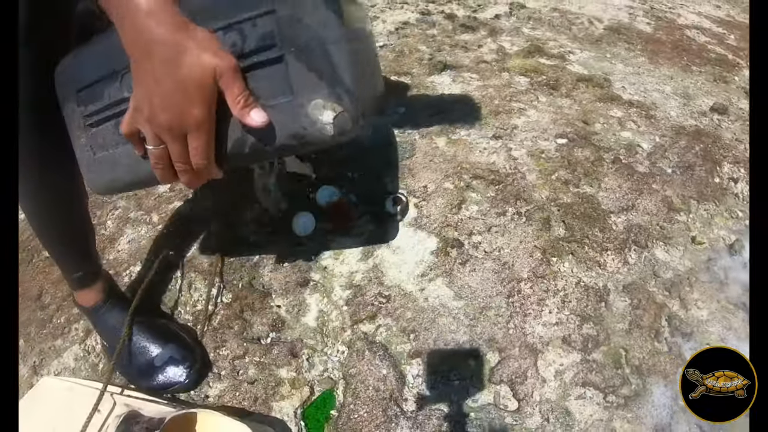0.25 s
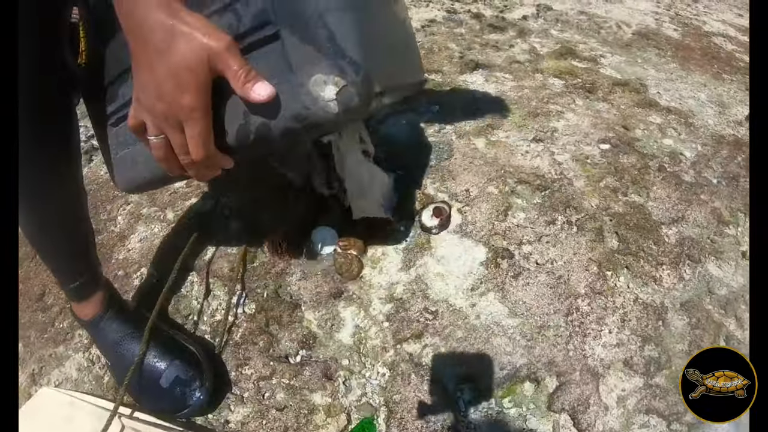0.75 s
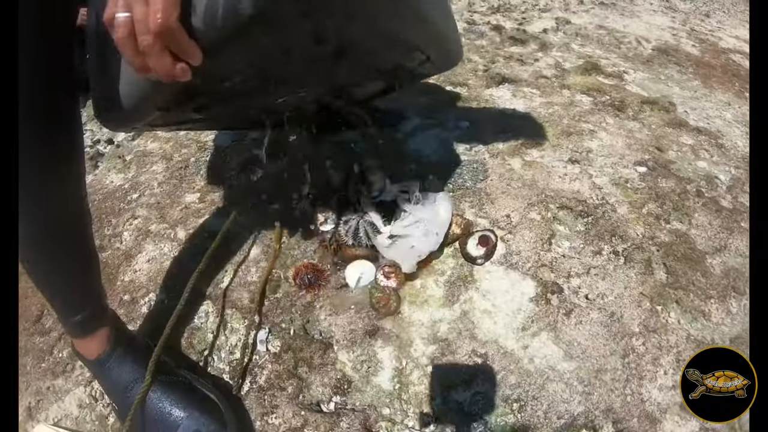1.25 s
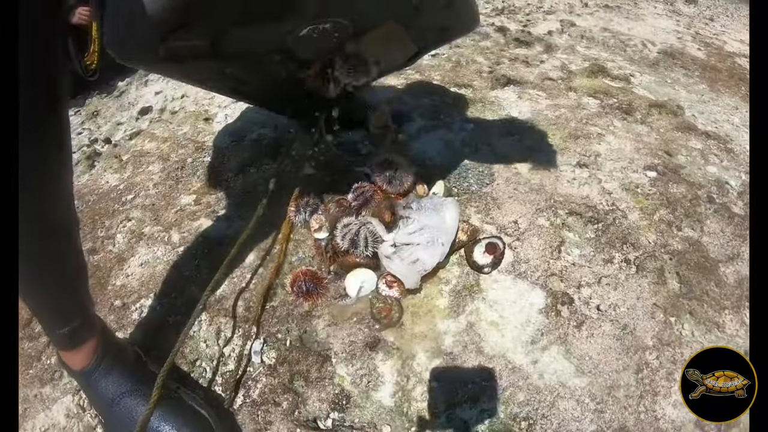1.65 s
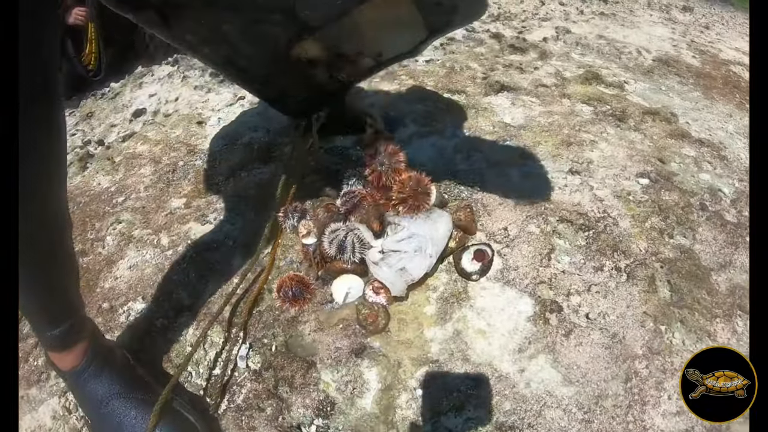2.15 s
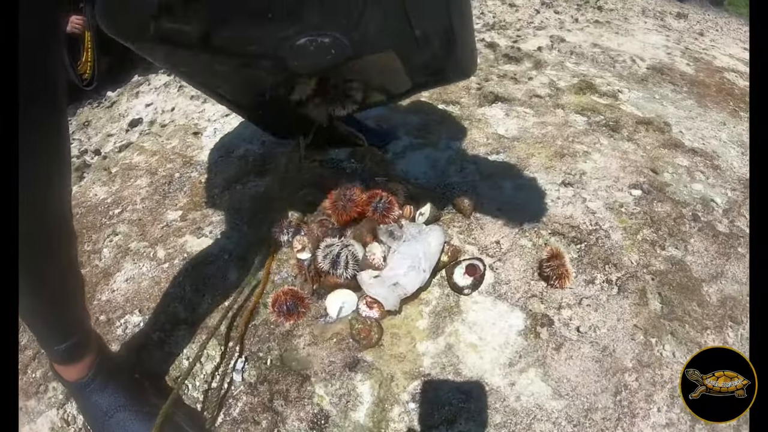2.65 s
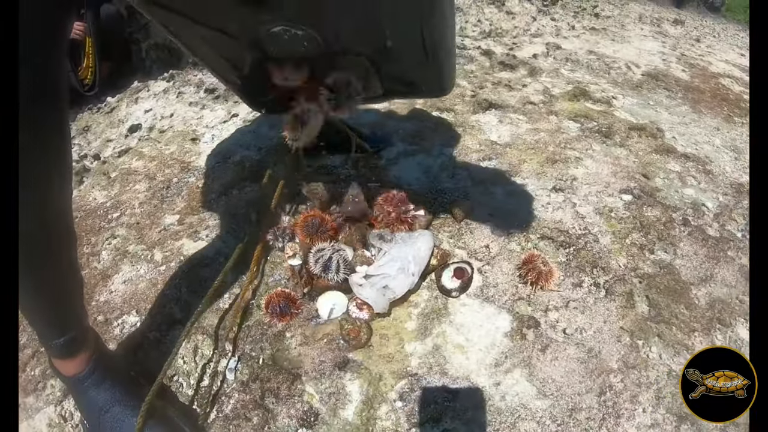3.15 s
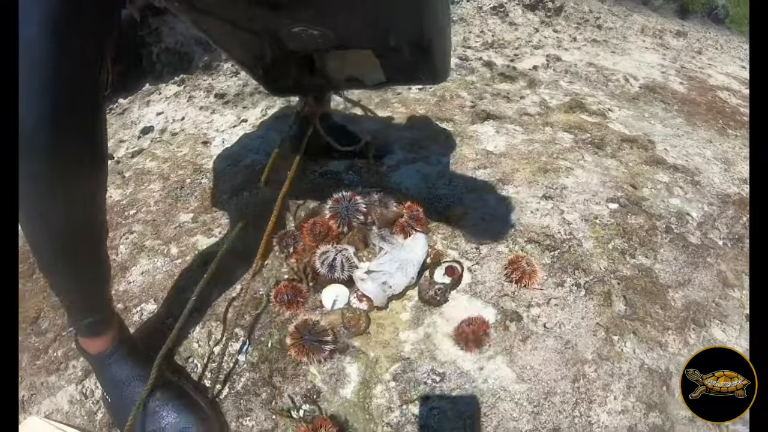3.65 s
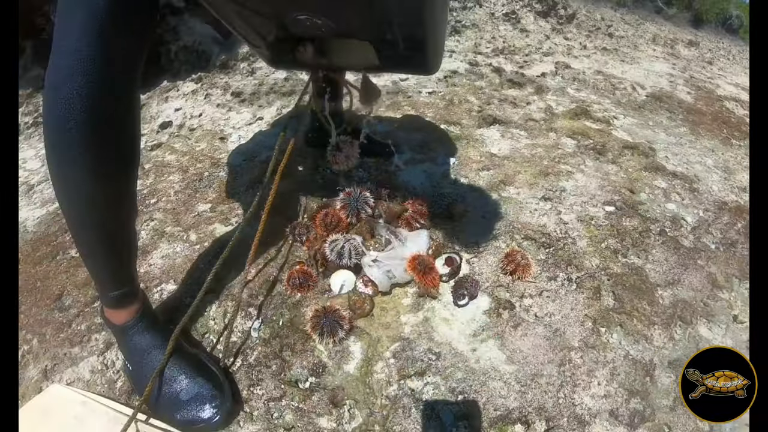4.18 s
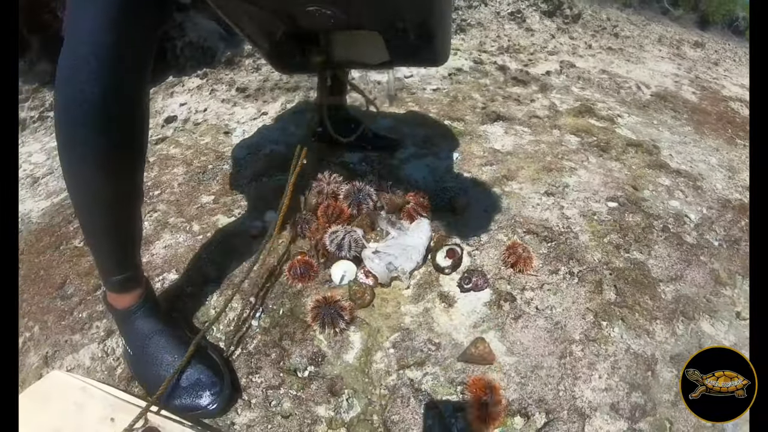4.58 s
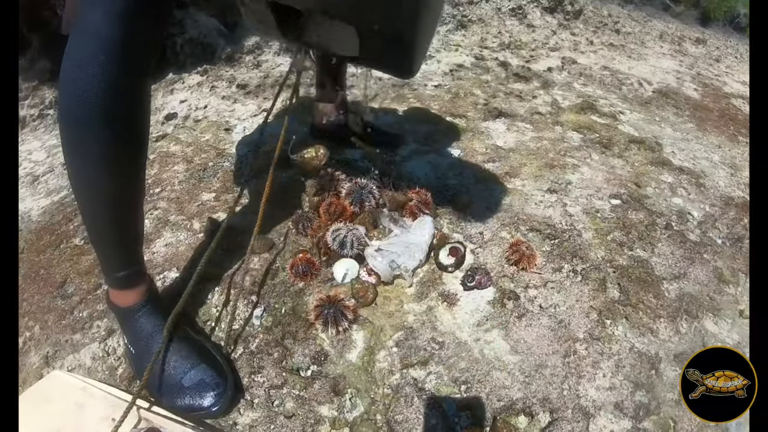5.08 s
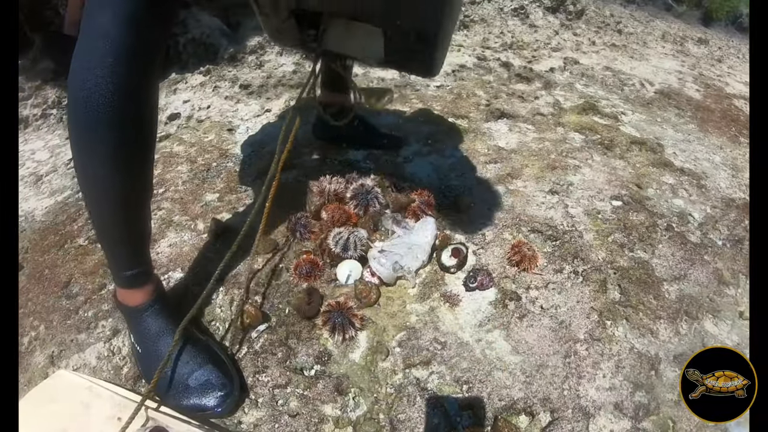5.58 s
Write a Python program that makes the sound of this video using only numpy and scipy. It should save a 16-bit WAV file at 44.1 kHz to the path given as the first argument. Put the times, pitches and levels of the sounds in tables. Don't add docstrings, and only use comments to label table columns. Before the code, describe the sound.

Shells and spiny sea urchins tumble out of a shaken hollow plastic container, clattering onto bare rock, with low wind rumble outdoors.

```python
import sys
import numpy as np
from scipy import signal
from scipy.fft import rfft, irfft, next_fast_len
from scipy.io import wavfile

SR = 44100
rng = np.random.default_rng(int(sys.argv[2]) if len(sys.argv) > 2 else 0)


def level_to_linear(level):
    exponent = np.asarray(level, float) / 20
    return 10 ** exponent


def log_audio(samples):
    frames = np.atleast_2d(samples).T
    limited = np.clip(frames, -1, 1)
    pcm = np.round(limited * 32767).astype(np.int16)
    wavfile.write(sys.argv[1], SR, pcm)


N = 256662

# full force in seconds, force in dB, time to fall 20 dB in seconds, wall rattle over boom in dB.
SHAKES = [(0.026, -12, .07, -9.5), (0.128, -21, 0.4, -14.5), (0.22, -16, 0.04, -8.5),
          (0.347, -10, 0.0969, -9), (0.497, -12.5, 0.1452, -11), (0.67, -20.5, 0.51, -7.5),
          (0.727, -22, 0.06, -3), (1.163, -20, 0.27, -14.5), (1.291, -24.5, 0.07, -7.5),
          (1.344, -28, 1.6, -10), (1.674, -19.5, 0.24, -8), (1.817, -28, 0.27, -2.5),
          (1.91, -13, 0.1465, -11), (2.072, -16, 0.09, -9), (2.305, -20, 0.23, -7.5),
          (2.451, -16.5, 0.08, -8.5), (2.815, -17.5, 0.21, -8.5), (2.88, -24.5, .04, 0),
          (3.179, -15, 0.33, -12.5), (3.512, -21.5, 0.2466, -5.5), (4.005, -23, 0.4, -11),
          (4.24, -23, 0.28, -10), (4.405, -26.5, 0.32, -9), (4.698, -31, .5, -9), (4.883, -24.5, 0.16, -8),
          (4.989, -22, 0.27, -9.5), (5.16, -25.5, 0.22, -9), (5.259, -28.5, 0.6, -8.5),
          (5.608, -30.5, 0.4, -3.5), (5.737, -26.5, 2, -9), (0.369, -19, 0.07, -9.5),
          (3.145, -34.5, 0.06, -7.5), (3.911, -40, 0.17, -5.5), (4.07, -30.5, 0.27, -3.5),
          (4.305, -27.5, 0.09, -6), (5.065, -28, 0.03, -4), (5.41, -31, 0.1, -4)]
# middle in seconds, depth in dB, half length in seconds.
CATCHES = [(0.102, 4, .015), (0.265, 5.5, 0.016), (0.336, 5, .01), (0.655, 7, 0.0086), (.838, 9.5, 0.013),
           (1.012, 7, .012), (1.102, 4.5, .015), (1.325, 8, 0.013), (1.411, 12, .02), (1.547, 3, 0.0072),
           (1.628, 11, .015), (1.815, 7, 0.014), (1.996, 8, 0.012), (2.288, 5.5, 0.0094),
           (2.538, 2, 0.0089), (3.662, 6, 0.0092), (3.944, 10, 0.014), (4.128, 6, 0.0068),
           (4.169, 8, 0.0084), (4.374, 5, 0.0098), (4.533, 3.5, .008), (4.601, 6, 0.011),
           (4.791, 5.5, .012), (4.852, 4.5, .01), (4.942, 8.5, .012), (5.107, 7, 0.017), (5.214, 6, 0.016),
           (5.323, 8.5, 0.015), (5.473, 6.5, .02), (5.671, 12.5, 0.03)]
# time in seconds, scratch over wall rattle in dB.
SPINE_DRAG = [(0, -17.5), (.45, -18.5), (.62, -10), (.75, -15.5), (.96, -9), (1.2, -19.5), (1.48, -11.5),
              (1.7, -21.5), (1.85, -19.5), (2.3, -18), (3.2, -23.5), (3.42, -10), (3.55, -21), (3.7, -10),
              (4.3, -21), (4.41, -11), (4.9, -20.5), (5.6, -15)]
# pitch in Hz, level in dB.
BOOM_MODES = [(112, -11.5), (140, -8.5), (164, 4), (186, -5.5), (228, -5.5), (290, -11.5)]
# pitch in Hz, level in dB per Hz.
WALL_COLOUR = [(350, -12.5), (530, 4), (750, 1.5), (1085, 7), (1140, 1), (2070, 1.5), (2600, -4.5),
               (3400, -2), (3700, -31)]
# pitch in Hz, level in dB per Hz.
SPINE_COLOUR = [(3500, 1), (5000, -1.5), (6700, -16), (8000, -7.5), (13000, -5.5), (15000, -21)]
# start in seconds, peak in dB, boom pitch in Hz.
HEAVY_HITS = [(0.125, -5.5, 198.6), (0.212, -4.5, 182), (0.339, -2.5, 181), (0.496, -10, 140),
              (0.615, -9.5, 147), (0.674, -14, 150), (0.848, -18, 154), (1.085, -17, 159),
              (1.158, -9.5, 176.5), (1.288, -26, 178), (1.651, -5, 182), (1.871, -6, 150), (1.923, -4, 185),
              (2.058, -6, 158), (2.253, -5, 219), (2.313, -10, 155), (2.378, -7, 206), (2.608, -15.5, 151),
              (2.797, -1, 208), (3.169, -4.5, 210), (3.511, -5.5, 172), (3.691, -11.5, 171),
              (3.993, -11.5, 175.3), (4.4, -11.5, 158), (4.574, -19, 142), (5.027, -3.5, 175),
              (5.155, -14, 168), (5.259, -11.5, 147), (5.432, -15, 97), (5.744, -7.5, 159)]
# start in seconds, peak in dB, boom pitch in Hz.
MORE_HITS = [(0.371, -6.5, 223), (0.544, -3.5, 147.4), (0.565, -6, 160), (0.796, -10, 159),
             (1.179, -9, 178), (1.224, -13.5, 167), (1.505, -17, 124), (1.694, -6.5, 189),
             (1.724, -11, 134), (1.959, -9.5, 176), (2.091, -13, 180), (3.203, -9, 196), (3.245, -6, 184),
             (4.029, -17, 157), (4.094, -11, 160), (4.243, -13, 151), (4.294, -15, 176),
             (4.709, -22, 170), (4.914, -17, 162), (5.504, -15, 102)]
# start in seconds, peak in dB, wall pitch in Hz.
WALL_KNOCKS = [(0.021, -8.5, 507), (0.121, -8.5, 850), (0.16, -8.5, 1310), (0.218, -6, 910),
               (0.348, -13, 1270), (0.506, -7.5, 954), (0.605, -8.5, 1080), (0.726, -5.5, 1065),
               (0.762, -7.5, 807), (0.847, -16, 1200), (1.288, -13.5, 545), (1.345, -12, 567),
               (1.561, -12, 533), (1.82, -8.5, 1090), (2.073, -8.5, 992), (2.095, -8, 1020),
               (2.257, -10, 475), (2.309, -0.5, 808), (2.451, -5, 890), (2.719, -17, 1460),
               (2.864, -15.5, 475), (2.887, -4.5, 1017), (2.959, -17.5, 1150), (3.017, -14, 903),
               (3.203, -7.5, 917), (3.317, -12, 990), (3.481, -14.5, 810), (4.612, -30, 1390),
               (5.704, -18.5, 1136), (5.792, -4.5, 1002)]
# start in seconds, peak in dB, wall pitch in Hz.
WALL_BUMPS = [(0.0848, -22, 440), (0.1819, -22, 480), (0.2183, -12.5, 420), (0.6618, -19, 880),
              (1.0908, -36, 1110), (1.2013, -23, 664), (1.2215, -24.5, 464), (1.8657, -18, 440),
              (2.3833, -18, 400), (2.5089, -23, 880), (2.8311, -17, 1080), (2.9136, -23, 710),
              (3.2575, -19, 446), (3.3759, -27, 1060), (3.5359, -16, 440), (3.6125, -26, 584),
              (4.2276, -27, 555), (4.4048, -27, 660), (4.5044, -29, 440), (4.9734, -24, 655),
              (5.045, -22, 410), (5.0666, -19.5, 1100), (5.1257, -28, 760), (5.1749, -25.5, 545),
              (5.4152, -23.5, 940)]
# start in seconds, peak in dB, panel pitch in Hz.
PANEL_THUDS = [
    (0.084, -18, 230),
    (0.2643, -22, 200),
    (0.6831, -16.5, 220),
    (1.1746, -14.5, 200),
    (1.4474, -24, 250),
    (1.56, -23, 308),
    (1.6735, -11, 210),
    (2.4535, -13.5, 303),
    (2.5047, -19, 220),
    (2.6778, -34, 200),
]
# start in seconds, peak in dB, pitch in Hz.
SHELL_CLACKS = [(0.0283, -12, 1520), (0.0556, -26, 1370), (0.1832, -25, 1380), (0.2067, -17, 1600),
                (0.2321, -19, 1700), (0.3717, -9.5, 1360), (0.5747, -22, 1560), (0.6343, -17, 4310),
                (1.09, -39, 3240), (1.501, -25, 2000), (1.6357, -29, 2850), (1.8631, -20, 1310),
                (1.957, -18, 1300), (2.0446, -23, 1660), (2.0946, -19, 1980), (2.254, -26, 2190),
                (2.3519, -18, 1870), (2.5098, -25, 1440), (2.6943, -45, 2180), (2.8506, -22, 2160),
                (2.9621, -26, 1850), (2.9822, -33, 2090), (3.2065, -14, 2310), (3.3835, -28, 2140),
                (4.2014, -31, 1740), (4.4584, -28, 2120), (4.5073, -30, 2100), (4.5168, -32, 1310),
                (4.7731, -32, 1990), (4.8887, -25, 1720), (4.9386, -33, 1680), (4.9715, -26, 1500),
                (5.361, -28, 3420), (4.6117, -21.5, 1400), (.8455, -15, 1100)]
# start in seconds, peak in dB, shell pitch in Hz, left-right in dB.
ROCK_LANDINGS = [(0.021, -9, 1800, 8), (0.084, -20.5, 3040, 0), (0.162, -15.5, 2280, 1),
                 (0.22, -6.5, 1700, 1), (0.344, -8, 2290, 1), (0.6335, -22, 3500, 6),
                 (0.6632, -4.5, 2250, -3), (0.7045, -7.5, 2900, -2.5), (0.791, -11.5, 2080, 1),
                 (0.814, -16.5, 3070, -4), (0.874, -15, 2070, 6), (1.0257, -12, 2020, -6),
                 (1.3479, -15, 1650, 1), (1.4314, -16, 2980, -3), (1.702, -18, 2140, 0),
                 (1.837, -6.5, 3090, -3), (2.055, -22, 2190, 4.5), (2.074, -8.5, 2240, -6.5),
                 (2.302, -5, 1510, -4), (2.308, -7, 1530, 10), (2.548, -18, 2350, -3),
                 (3.319, -10.5, 2220, 2), (3.5052, -14.5, 2310, -4), (3.579, -8, 1860, 2.5),
                 (3.678, -10.5, 2130, -3), (4.089, -18.5, 1960, -1), (4.5417, -4.5, 1920, -4.5),
                 (4.613, -16, 2230, -3), (5.7085, -18.5, 1900, -1), (5.7878, -11, 1670, 1)]
# start in seconds, peak in dB, shell pitch in Hz.
PILE_LANDINGS = [(0.123, -19.5, 1870), (0.2055, -27, 1690), (0.31, -19, 2100), (0.3426, -24, 1690),
                 (0.4296, -29, 2850), (0.499, -23, 1920), (1.076, -22, 1900), (1.221, -20, 1710),
                 (1.275, -25, 1870), (1.559, -21, 2880), (.406, -21, 1900), (.984, -24, 2200),
                 (.8215, -20, 2100), (1.8841, -26, 3170), (1.922, -29, 2160), (4.637, -33, 1500),
                 (2.3114, -14.5, 2260), (2.4493, -14.5, 2260), (2.588, -32, 1690), (2.8514, -27, 1900),
                 (3.203, -15, 2180), (3.4477, -22, 2220), (3.855, -29, 2680), (4.6828, -25.5, 2270),
                 (5.0048, -22, 2010), (5.252, -22, 2090), (5.6052, -22, 3220), (1.607, -32, 3150)]
# start in seconds, peak in dB, shell pitch in Hz, brightness in dB.
URCHIN_LANDINGS = [(0.557, -9.5, 1910, -6.5), (0.612, -8.5, 2200, -15.5), (0.725, -18, 1840, -11),
                   (0.76, -7.5, 1900, -13), (0.7667, -8, 2040, -10), (0.845, -19, 1500, -33),
                   (0.9124, -19, 1820, -14), (0.9456, -9.5, 2530, -4), (1.4744, -12, 3220, -0.5),
                   (2.226, -23.5, 2170, -21), (2.6288, -37, 3300, -15), (2.6587, -16, 2450, -9.5),
                   (2.7216, -22, 3000, -11), (3.252, -14.5, 1960, -15), (3.2882, -9.5, 2660, -12),
                   (3.5327, -13.5, 1790, -24), (4.061, -26, 1880, -14), (4.143, -20.5, 1760, -6),
                   (4.2978, -19, 2630, -19), (4.3048, -16, 2660, -35), (4.9556, -24, 2720, -23.5),
                   (5.3348, -31, 3460, -9), (5.3494, -16.5, 3060, -7)]
SHELL_MODES = [1.03, 1.44, 1.585, 1.62, 1.855, 0.58]
# start in seconds, peak in dB, pitch in Hz.
SPINE_TICKS = [(0.4323, -23, 3830), (0.6743, -11.5, 3300), (0.9647, -20.5, 3040), (1.3563, -31, 2900),
               (1.5552, -35, 2800), (1.8438, -14.5, 3240), (2.1082, -23.5, 3500), (2.3496, -27, 2540),
               (2.369, -27, 3030), (2.4407, -31, 3250), (2.733, -35, 3670), (2.864, -22.5, 3130),
               (4.576, -31, 3900), (3.2632, -23, 3250), (3.422, -37, 2480), (4.715, -28, 4300),
               (3.692, -20.5, 2730), (3.784, -31.5, 3220), (3.816, -35, 2500), (4.174, -32, 3420),
               (4.4, -29, 4640), (4.4233, -31, 4200), (4.6943, -26, 4200), (5.5184, -27, 2960),
               (5.5774, -25.5, 2920)]
# start in seconds, peak in dB, pitch in Hz.
GRIT_TICKS = [(.013, -19, 3270), (.112, -38, 4000), (.185, -27, 1500), (.284, -33, 4970),
              (1.056, -34, 3500), (1.775, -27, 3000), (2.29, -39, 4000), (2.781, -37, 4000),
              (2.822, -28.5, 4000), (3.087, -34, 2000), (5.068, -33, 1800), (5.195, -33, 3470),
              (5.268, -27, 3480), (5.322, -39, 4700), (5.45, -36, 4000), (.873, -19.5, 4480),
              (.61, -20.5, 5000), (1.552, -34, 5500), (3.91, -40, 1500)]
# start in seconds, peak in dB.
GRIT_SPRAY = [(0.0353, -40), (0.4808, -50), (0.7292, -36), (0.8734, -49), (1.843, -41), (1.8677, -36.5),
              (2.2897, -45), (2.3679, -37), (2.4389, -47), (2.5441, -49), (3.2629, -42), (3.4201, -46),
              (3.5154, -48), (3.5399, -43), (3.6945, -40), (3.7798, -44), (4.2926, -45), (4.3794, -43),
              (4.4019, -34.5), (4.4233, -39), (4.4682, -48), (5.5179, -47), (5.5772, -40)]
# time in seconds, level in dB.
GUSTS = [(0.0, -34), (0.05, -38.5), (0.71, -38.5), (0.78, -29.5), (0.95, -36.5), (2.38, -29.5),
         (2.45, -34.5), (3.15, -34), (3.28, -29), (3.84, -39.5), (4.05, -26.5), (4.08, -33.5),
         (5.38, -36.5), (5.45, -23), (5.49, -30.5), (5.82, -37.5)]
# pitch in Hz, level in dB per Hz.
SURF_COLOUR = [(200, 0), (450, -26), (1090, -29), (2060, -8), (3300, -13), (6500, -24), (12800, -15),
               (15000, -34)]
# pitch in Hz, level in dB.
HOUSING = [(6600, 0.89), (7200, -5.5), (15000, -18.5)]
# pitch in Hz, left-right in dB.
PORT_LEAN = [(30, 5), (100, 0), (280, 0.5), (480, 1), (800, 6), (1340, 1.5), (2250, -3), (6000, 2),
             (8000, -8), (12000, -11.5)]

BOOM_T60_S = .095
LEFT_RIGHT = np.array([[1], [-1]])


def rms_one(x):
    return x / np.sqrt(np.mean(x ** 2) + 1e-20)


def in_time(rows):
    s, *columns = np.transpose(rows)
    return [np.interp(np.arange(N) / SR, s, c) for c in columns]


def at_hz(points, hz):
    curve_hz, db = np.transpose(points)
    return np.interp(np.log(hz), np.log(curve_hz), db)


def band(x, low_hz, high_hz):
    return signal.sosfilt(signal.butter(2, [low_hz, min(high_hz, .45 * SR)], "band", fs=SR, output="sos"), x)


def high_pass(x, order, hz):
    return signal.sosfilt(signal.butter(order, hz, "high", fs=SR, output="sos"), x)


def drift(rate_hz, at=None):
    r = np.exp(-80 * np.pi * rate_hz / SR)
    slow = signal.lfilter([1], [1, -2 * r, r * r], rng.standard_normal(N // 40 + 2002))[2000:]
    where = np.arange(N) if at is None else at
    return np.interp(where / 40, np.arange(len(slow)), rms_one(slow))


def add(out, s, sound, pan_db):
    i = round(s * SR)
    out[:, i:i + sound.shape[-1]] += sound[..., :N - i] * level_to_linear(pan_db * LEFT_RIGHT / 2)


def ring(clicks, hz, t60):
    r, w = level_to_linear(-60 / (t60 * SR)), 2 * np.pi * hz / SR
    return signal.lfilter([0, np.sin(w)], [1, -2 * r * np.cos(w), r * r], clicks + 1e-18)


def blow(hz, gains, t60, rise_s):
    t = np.arange(round(.12 * SR)) / SR
    turns = np.outer(t, hz) + rng.random(len(hz))
    sound = (gains * np.sin(2 * np.pi * turns) * level_to_linear(-60 * t[:, None] / t60)).sum(axis=1)
    sound = sound * (1 - np.exp(-t / rise_s))
    return sound / np.abs(sound).max()


def contacts(per_s, spread_db, clump_db):
    at = np.flatnonzero(rng.random(N) < per_s * level_to_linear(clump_db * drift(25)) / SR)
    draw = rng.random((N, 2))[at]
    size = level_to_linear(spread_db * np.minimum(-np.log(1 - draw[:, 0]), 4))
    return at, size * np.sign(draw[:, 1] - .5)


def spread_modes(colour, low_hz, high_hz, cycles, count):
    hz = np.geomspace(low_hz, high_hz, count) * level_to_linear(rng.normal(0, .2, count))
    return zip(hz, at_hz(colour, hz) + 20 * np.log10(hz / 1000), cycles / hz)


def rattle(modes, hits, level_db, choosy_db, wide, shifting_db):
    at, size = hits
    mid, side, ahead = np.zeros((3, N))
    for hz, db, t60 in modes:
        clicks = np.zeros(N)
        chance_db = choosy_db * rng.standard_normal(len(at)) + shifting_db * drift(12.3, at)
        clicks[at] = size * level_to_linear(db + level_db[at] + chance_db)
        tone = ring(clicks, hz, t60)
        mid += tone
        side += wide * rng.uniform(-1.21, 1) * tone
        ahead += wide * rng.uniform(-0.66, 1) * tone / (2 * np.pi * hz / SR)
    side = side + np.gradient(ahead)
    return np.array([mid + side, mid - side])


def evened(x, level_db):
    return x * np.sqrt(np.mean(level_to_linear(level_db) ** 2) / np.mean(x ** 2))


def surges(over_db, swing, rest_db):
    s, force_db, fall_s, _ = np.transpose(SHAKES)[:, :, None]
    t = np.arange(0, N + 64, 64) / SR
    building_db = 296 * (s - t)
    falling_db = 20 * ((t - s) / fall_s - 0.2)
    below_db = np.maximum(building_db, falling_db).clip(0)
    power = np.sum(level_to_linear(force_db + over_db - swing * below_db) ** 2, axis=0) + level_to_linear(rest_db) ** 2
    return np.interp(np.arange(N) / SR, t, 10 * np.log10(power))


def lulls():
    s, depth_db, half_s = np.transpose(CATCHES)[:, :, None]
    t = np.arange(0, N + 64, 64) / SR
    dips_db = np.sum(depth_db * np.exp(-((t - s) / half_s) ** 2), axis=0)
    return np.interp(np.arange(N) / SR, t, dips_db)


def booming(boom_db):
    pushes = contacts(300, spread_db=1.0, clump_db=2.5)
    modes = [(hz, db, BOOM_T60_S) for hz, db in BOOM_MODES]
    fade_db = 1.5 * (np.arange(N) - .4 * N) / SR
    how = dict(choosy_db=4.0, wide=0.1, shifting_db=1.5)
    boom = rattle(modes[:4], pushes, boom_db, **how) + rattle(modes[4:], pushes, boom_db - fade_db, **how)
    return evened(band(boom, 73, 372), boom_db - 2.0)


def rattling_walls(wall_db):
    blunt = contacts(1000, spread_db=2.0, clump_db=3.0)
    modes = spread_modes(WALL_COLOUR, 353.0, 3578, cycles=30, count=32)
    walls = band(rattle(modes, blunt, wall_db, choosy_db=6.0, wide=0.75, shifting_db=3.5), 240, 3650)
    tilt_db = 0.99 * (np.arange(N) - N / 2) / SR
    high = high_pass(walls, 1, 1500)
    walls = level_to_linear(tilt_db) * high + level_to_linear(-tilt_db) * (walls - high)
    return evened(walls, wall_db + 1.01)


def scratching_spines(spine_db):
    sharp = contacts(1800, spread_db=2.0, clump_db=6.5)
    modes = spread_modes(SPINE_COLOUR, 4000, 12870, cycles=22, count=24)
    spines = rattle(modes, sharp, spine_db, choosy_db=-0.5, wide=0.8, shifting_db=5.5)
    return evened(band(spines, 3000, 18000), spine_db - 0.5)


def tumbling():
    rattle_over_db = np.array(SHAKES)[:, -1:]
    drag_db, = in_time(SPINE_DRAG)
    lull_db = lulls()
    boom_db = surges(0, 0.97, -46.5) - .5 * lull_db
    wall_db = surges(rattle_over_db, 1.403, -60) - lull_db
    spine_db = drag_db + surges(rattle_over_db, 1.14, -60) - .5 * lull_db
    return booming(boom_db) + rattling_walls(wall_db) + scratching_spines(spine_db)


def thumps(table):
    out, (hz, db) = np.zeros((2, N)), np.transpose(BOOM_MODES)
    for (s, peak_db, pitch_hz), luck in zip(table, rng.standard_normal((len(table), len(BOOM_MODES)))):
        gains = np.append(level_to_linear(db - 6.0 + 4.6 * luck), 1)
        sound = blow(np.append(hz, pitch_hz), gains, 0.88 * BOOM_T60_S, rise_s=0.0024)
        add(out, s, level_to_linear(peak_db - 6.0) * sound, 0)
    return out


def knocks(table, trim_db, cycles, rise_s, scatter_db):
    out = np.zeros((2, N))
    for (s, peak_db, hz), luck in zip(table, rng.standard_normal((len(table), 17))):
        cluster = hz * np.append(1, level_to_linear(scatter_db * luck[:8]))
        gains = np.append(1, level_to_linear(-6.5 + 1.0 * luck[8:16]))
        add(out, s, level_to_linear(peak_db + trim_db) * blow(cluster, gains, cycles / cluster, rise_s), 1.7 * luck[16])
    return out


def landings():
    out, t = np.zeros((2, N)), np.arange(round(.12 * SR)) / SR
    dull_db, pile_pan_db = -30, 0.5
    falls = [(s, db, hz, dull_db, pan_db) for s, db, hz, pan_db in ROCK_LANDINGS]
    falls += [(*row, dull_db, pile_pan_db) for row in PILE_LANDINGS]
    falls += [(*row, pile_pan_db) for row in URCHIN_LANDINGS]
    for (s, peak_db, hz, bright_db, pan_db), luck in zip(falls, rng.standard_normal((len(falls), 12))):
        modes = hz * np.array(SHELL_MODES) * level_to_linear(.5 * luck[:6] * (np.arange(6) > 0))
        gains = level_to_linear(np.array([6.0, -6.5, -2.0, -7.5, -6.0, -23.0]) + 2.0 * luck[6:])
        tail = band(rng.standard_normal(len(t)) * level_to_linear(-60 * t / .035), 0.84 * hz, 1.89 * hz)
        crack = band(rng.standard_normal((2, len(t))) * level_to_linear(-60 * t / .012), 2900, 14000)
        sound = blow(modes, gains, t60=.008, rise_s=0.000062) + level_to_linear(-12) * tail / np.abs(tail).max()
        sound = level_to_linear(peak_db - 3.5) * (sound + level_to_linear(bright_db + 1.5) * crack / np.abs(crack).max())
        add(out, s, sound, pan_db)
        add(out, s + .0046, level_to_linear(-17) * sound, -pan_db)
    return out


def ticks(table):
    out, t = np.zeros((2, N)), np.arange(round(0.018 * SR)) / SR
    for s, peak_db, hz in table:
        burst = rng.standard_normal((2, len(t))) * level_to_linear(-60 * t / 0.031)
        sound = band(burst[0], 0.54 * hz, 1.34 * hz) + level_to_linear(-21.5) * band(burst, 4700, 12000)
        add(out, s, level_to_linear(peak_db - 1.9) * sound / np.abs(sound).max(), -1.5)
    return out


def spray():
    out, t = np.zeros((2, N)), np.arange(round(0.03 * SR)) / SR
    for s, peak_db in GRIT_SPRAY:
        sound = band(rng.standard_normal((2, len(t))) * level_to_linear(-60 * t / 0.048), 8300, 15500)
        add(out, s, level_to_linear(peak_db + 11.5) * sound / np.abs(sound).max(), 0)
    return out


def wind():
    gust_db, = in_time(GUSTS)
    lumps = np.array([band(rng.standard_normal(N), 31, 109) * level_to_linear(2.8 * drift(0.97)) for port in range(2)])
    return level_to_linear(gust_db + 1.0) * rms_one(lumps) * level_to_linear(1.5 * LEFT_RIGHT)


def surf():
    out, edges = 0, 180 * 2 ** np.arange(0, 6.6, .5)
    white = rng.standard_normal((2, 2, N))
    for k, (low, high) in enumerate(zip(edges, edges[1:])):
        mid, side = band(white[k % 2], low, high)
        level_db = at_hz(SURF_COLOUR, np.sqrt(low * high)) + 1.0 * drift(14)
        out = out + level_to_linear(level_db) * (mid + 0.64 * side * LEFT_RIGHT)
    return level_to_linear(-58) * rms_one(out)


def scene():
    container = tumbling() + thumps(HEAVY_HITS) + thumps(MORE_HITS)
    container += knocks(WALL_KNOCKS, trim_db=-7.0, cycles=28, rise_s=0.00084, scatter_db=3.3)
    container += knocks(WALL_BUMPS, trim_db=-1.5, cycles=17.6, rise_s=.0012, scatter_db=2.49)
    container += knocks(PANEL_THUDS, trim_db=-1.5, cycles=12, rise_s=.002, scatter_db=1.44)
    clacks = knocks(SHELL_CLACKS, trim_db=-.7, cycles=22, rise_s=.0004, scatter_db=3.52)
    outside = clacks + landings() + ticks(SPINE_TICKS) + ticks(GRIT_TICKS) + spray() + wind() + surf()
    return outside + high_pass(container, 2, 85)


def band_limit(x):
    return signal.sosfilt(signal.butter(12, 15200, fs=SR, output="sos"), x)


def record(dry):
    size = next_fast_len(N + 4096)
    hz = np.maximum(np.fft.rfftfreq(size, 1 / SR), 1)
    colour = level_to_linear(at_hz(HOUSING, hz) + at_hz(PORT_LEAN, hz) / 2 * LEFT_RIGHT)
    lag_s = np.array([[3e-5], [0]])
    lag = np.exp(-2j * np.pi * hz * lag_s)
    padded = np.pad(dry, ((0, 0), (0, size - N)), "reflect")
    ports = irfft(rfft(padded) * colour * lag, size)[:, :N]
    peak_top = 1.15
    return band_limit(peak_top * np.tanh(1.099 * ports / peak_top))


dry = scene()
out = record(dry)
log_audio(out)
```